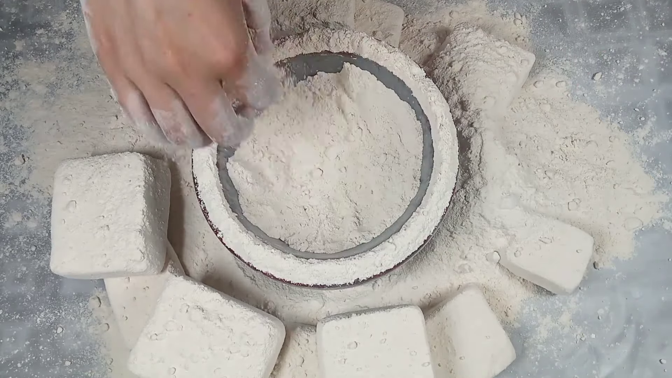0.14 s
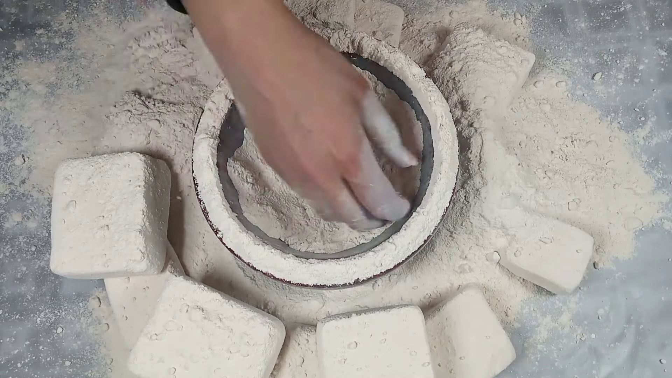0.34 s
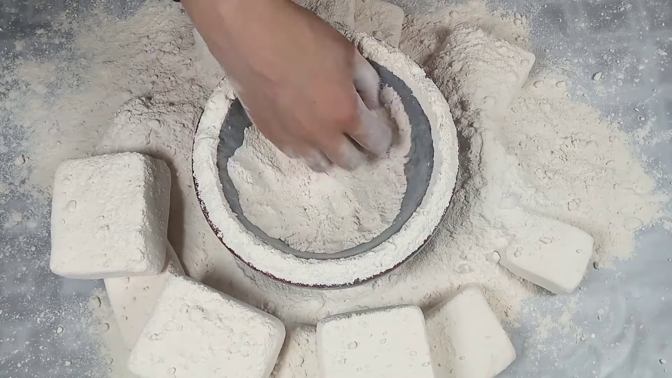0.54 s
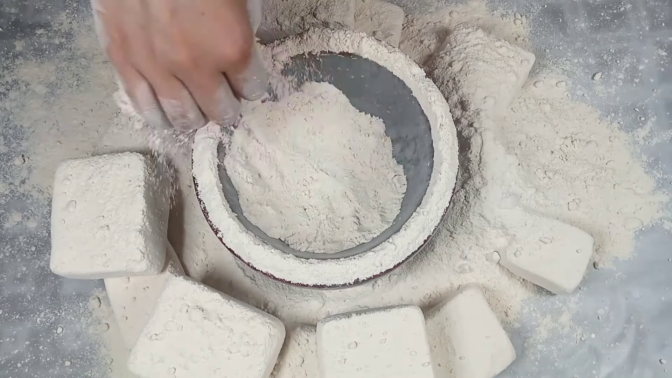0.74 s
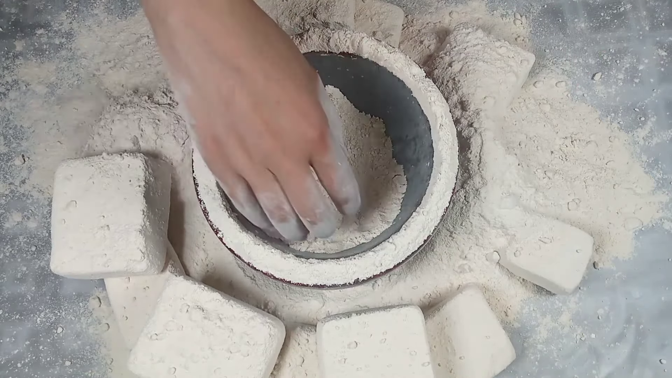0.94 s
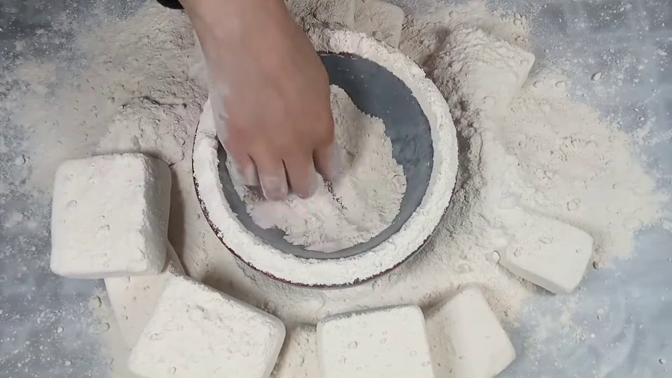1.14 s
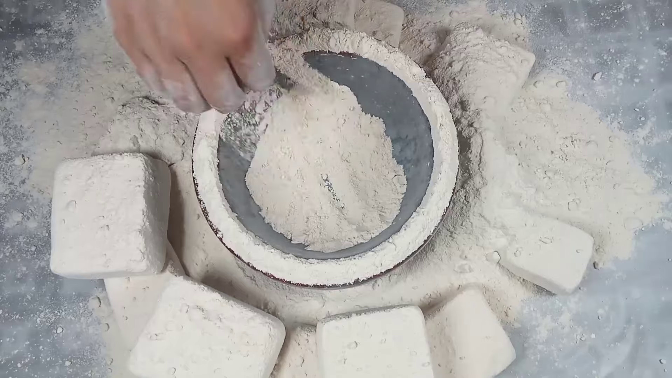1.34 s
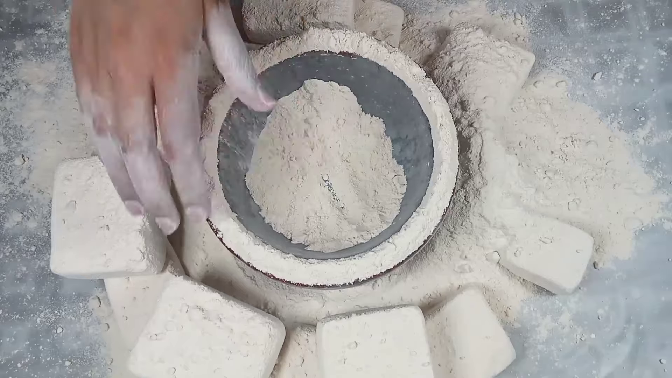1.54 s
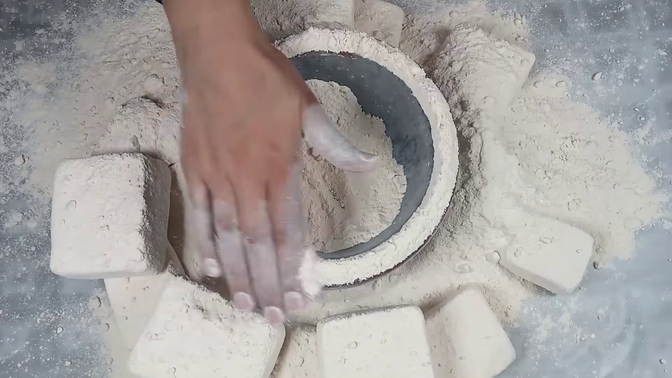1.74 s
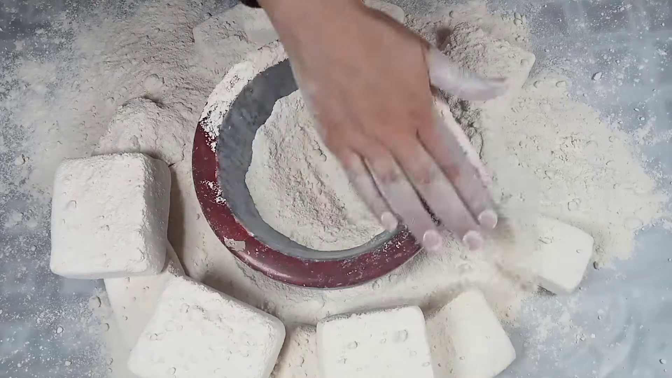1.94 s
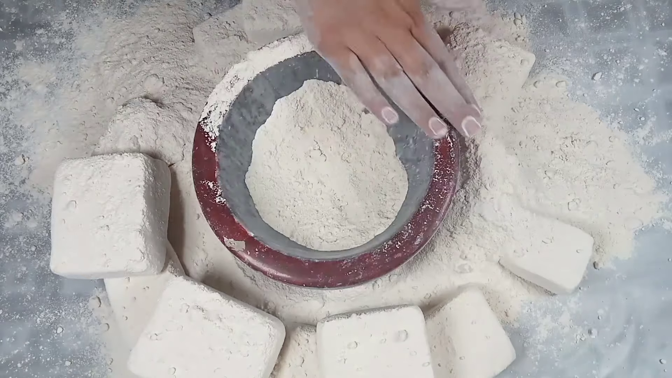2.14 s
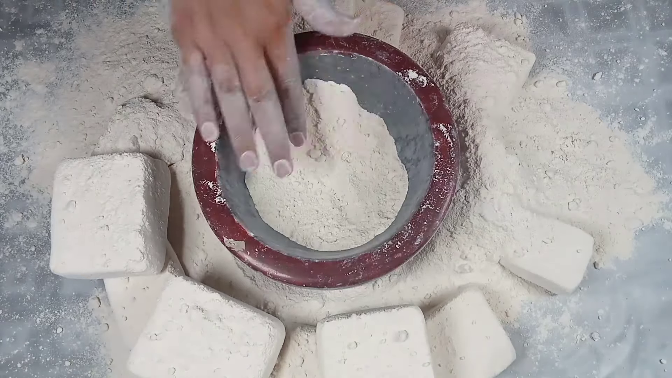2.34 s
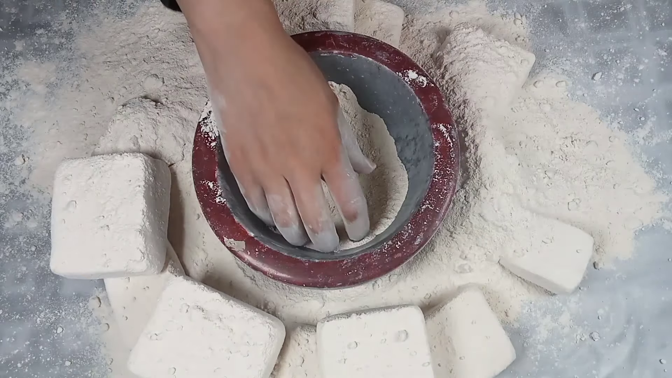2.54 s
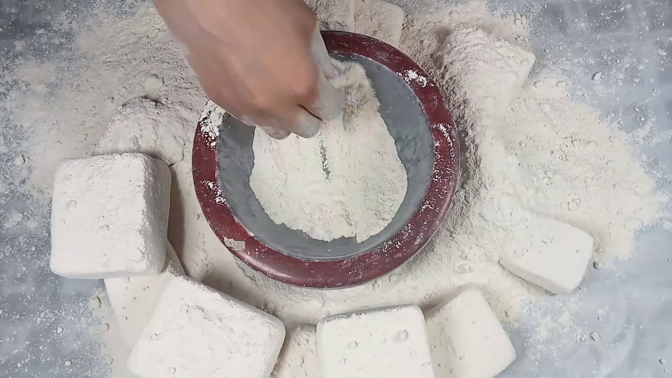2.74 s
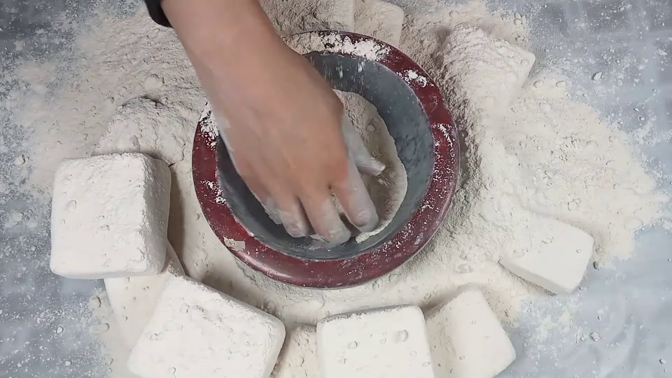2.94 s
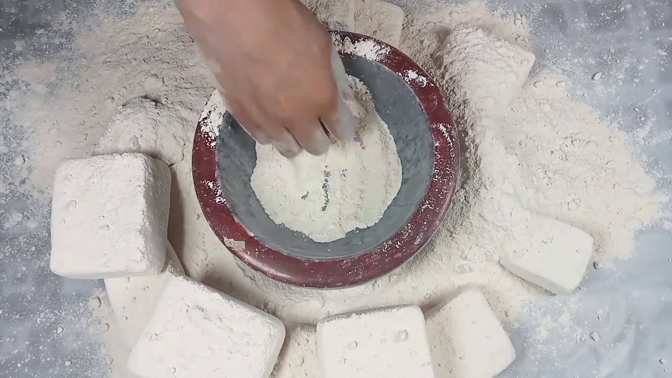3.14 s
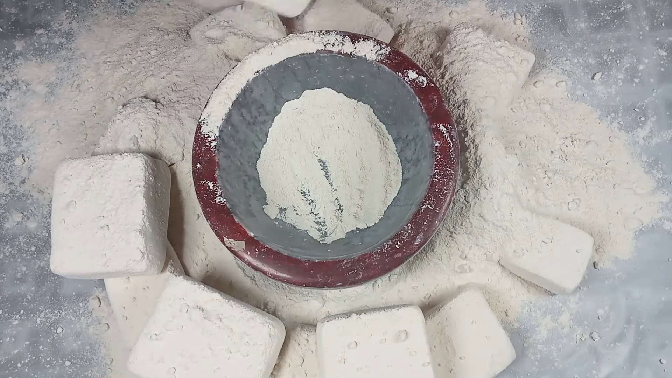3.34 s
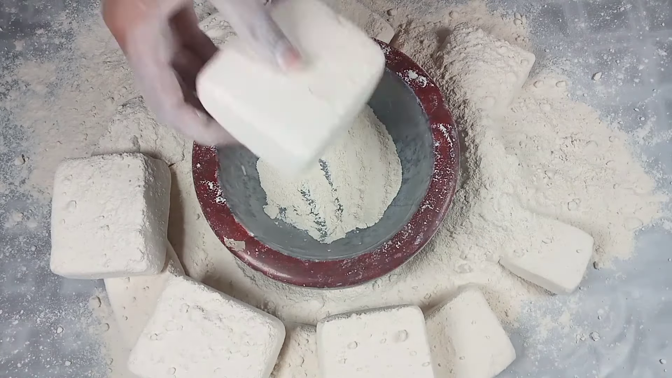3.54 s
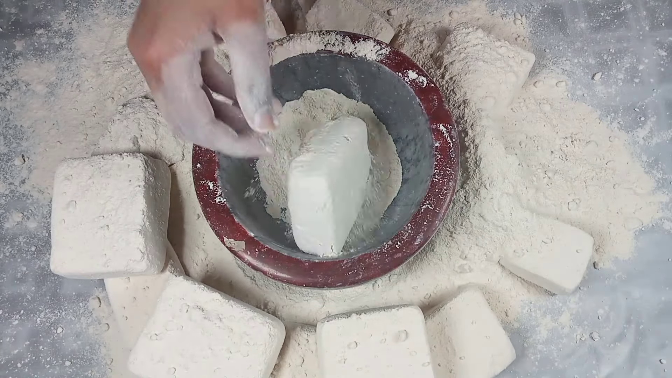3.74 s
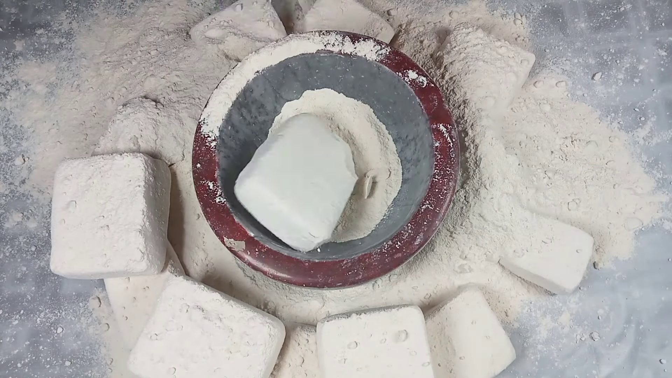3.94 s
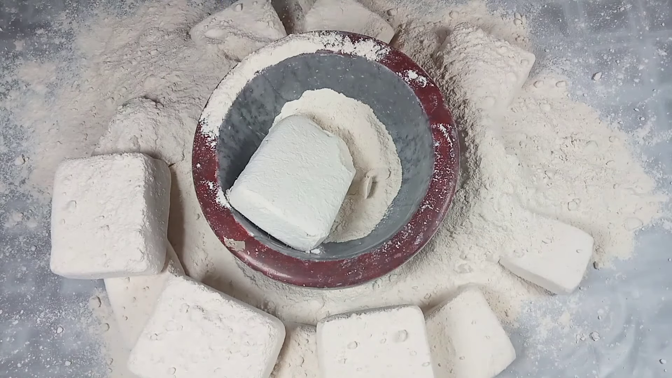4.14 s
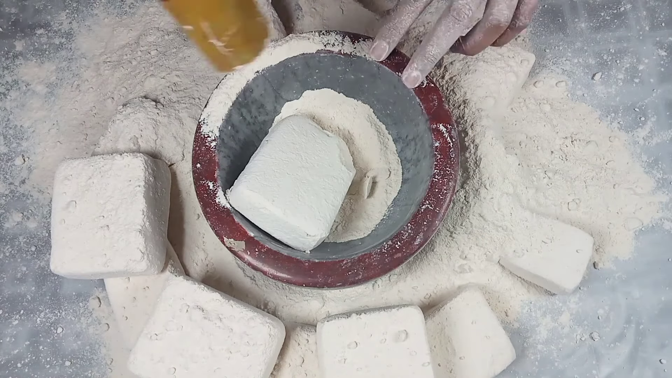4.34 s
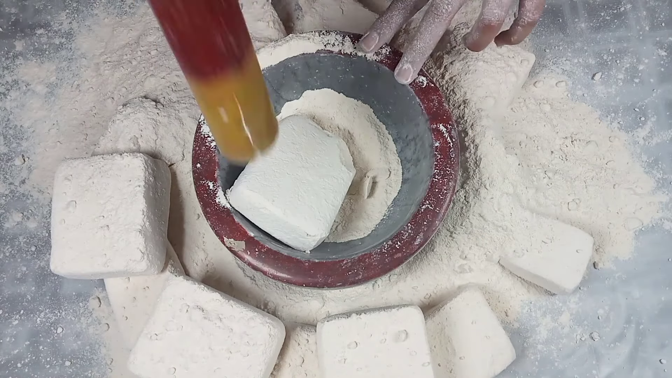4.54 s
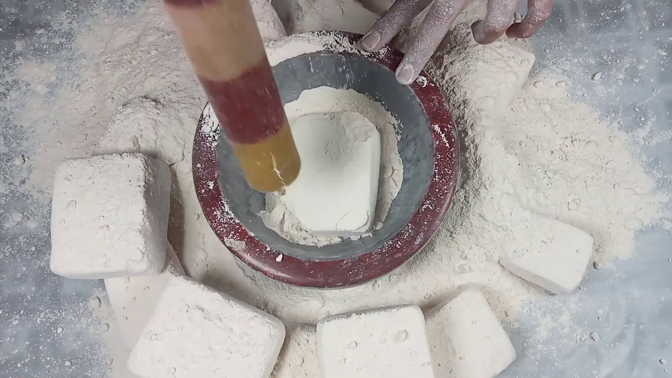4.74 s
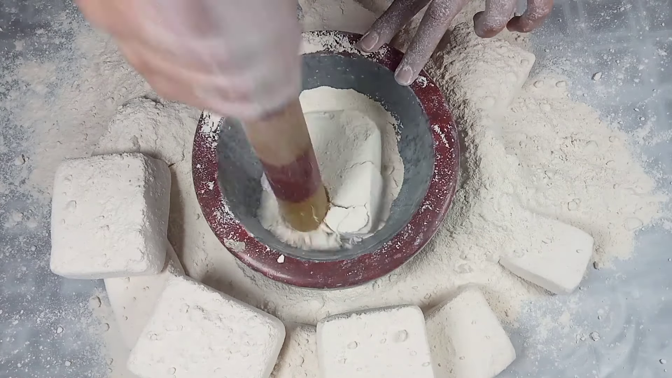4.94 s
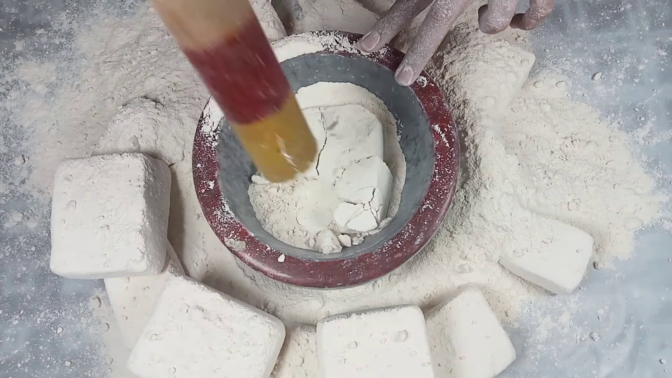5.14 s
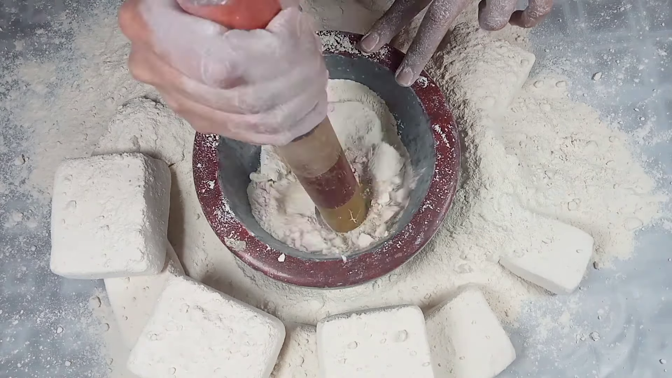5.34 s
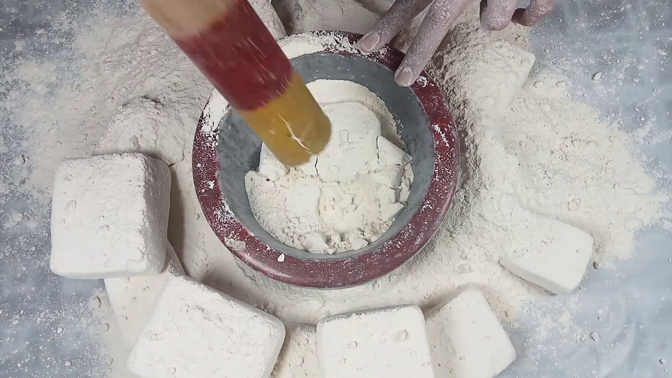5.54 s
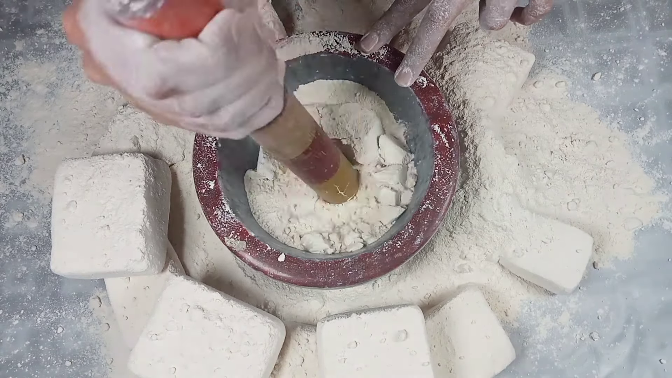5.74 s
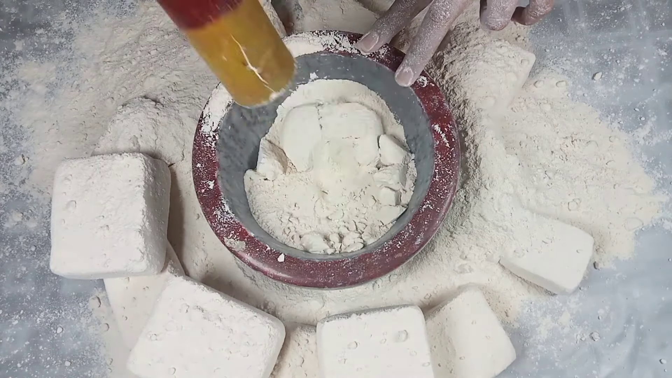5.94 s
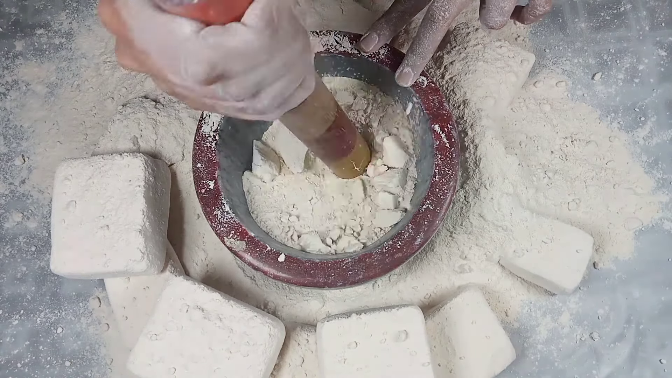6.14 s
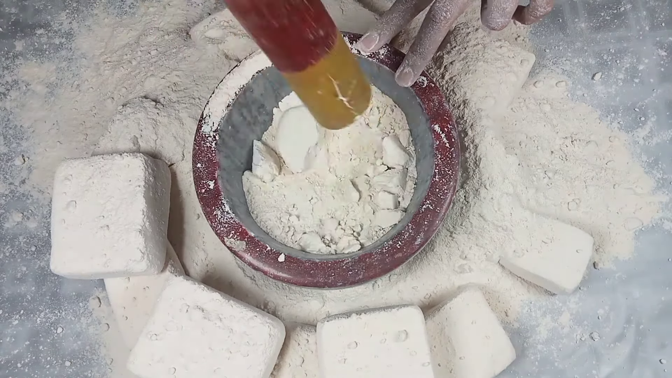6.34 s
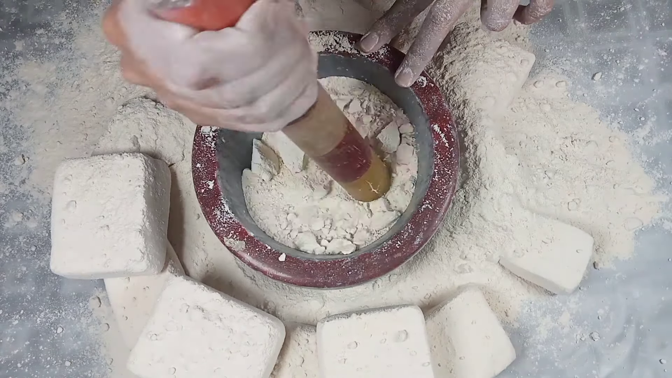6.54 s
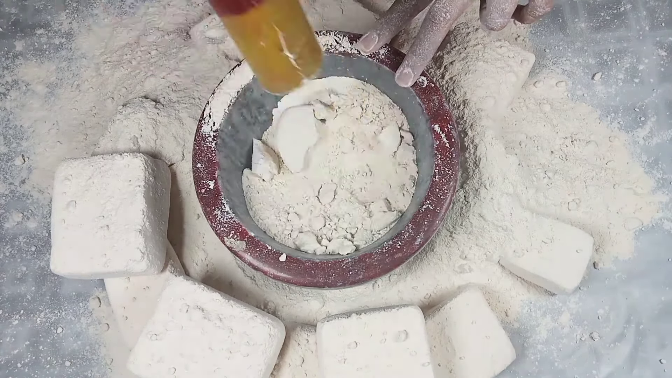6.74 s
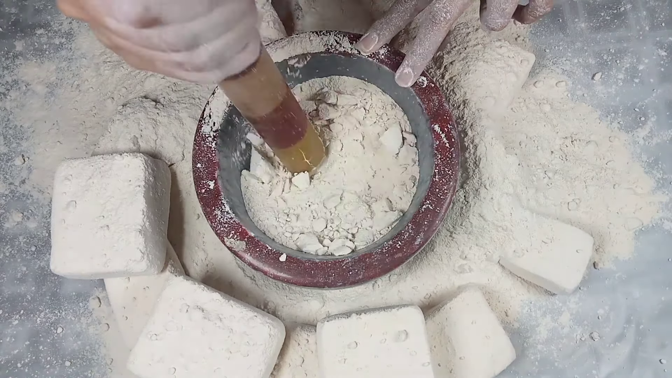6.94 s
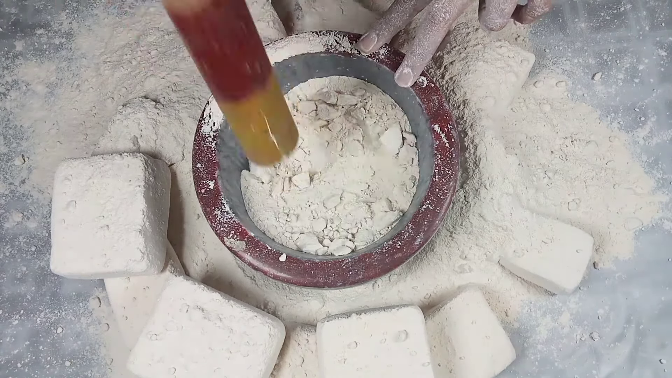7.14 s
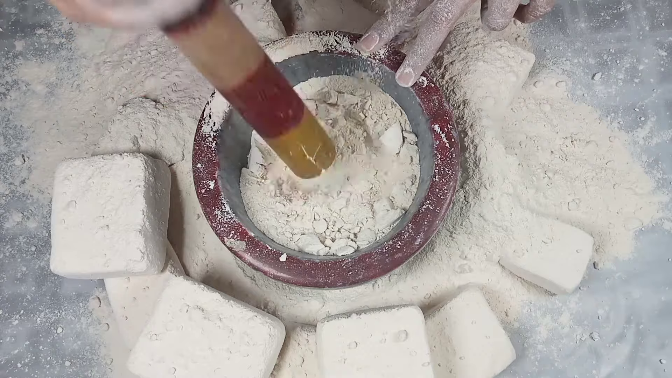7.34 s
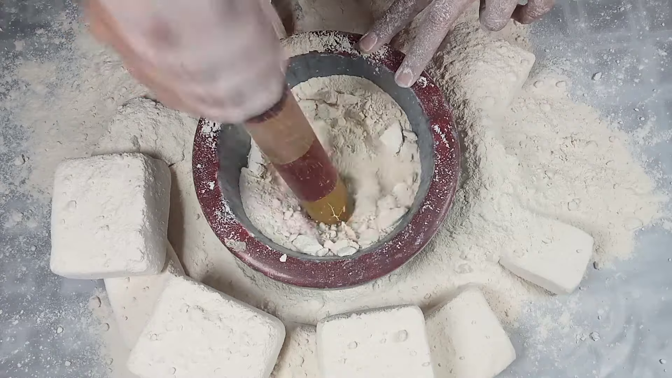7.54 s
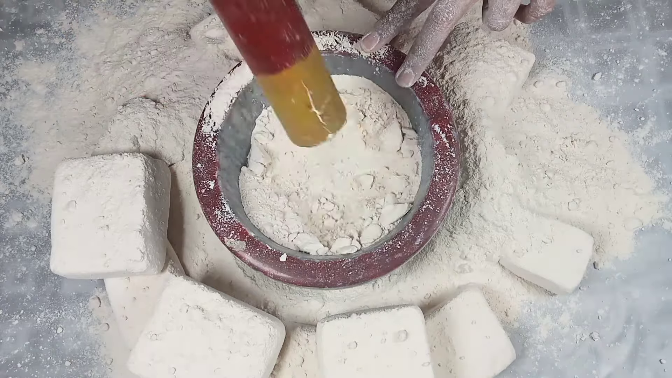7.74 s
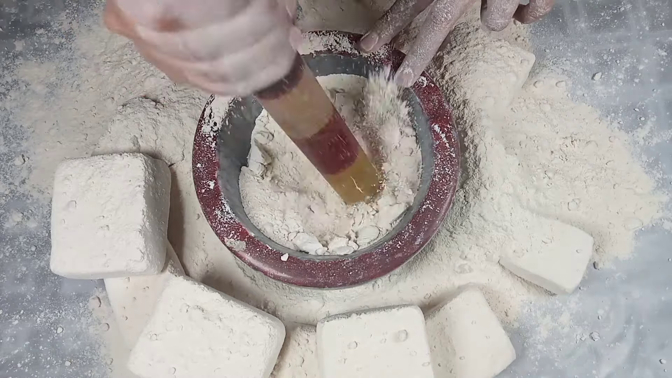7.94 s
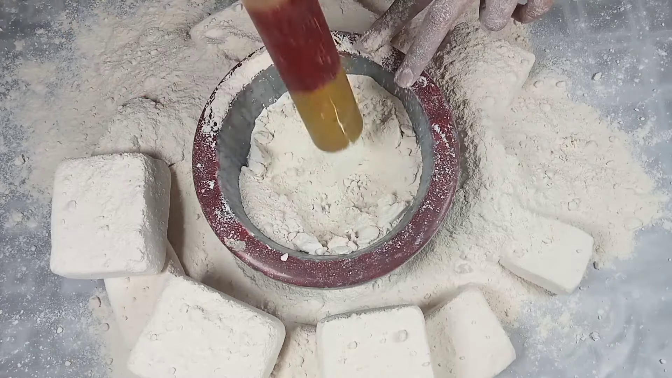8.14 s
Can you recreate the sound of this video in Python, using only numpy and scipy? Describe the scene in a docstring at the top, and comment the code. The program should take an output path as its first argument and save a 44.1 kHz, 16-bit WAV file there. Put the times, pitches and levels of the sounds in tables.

```python
"""Fingers scoop chalk powder in a heavy mortar and wipe its rim (shaped grit, knocks, soft pats of powder).
At 3.7 s a chalk block drops in and slides down. From 4.6 s a wooden pestle pounds it ten times:
filtered clicks for knocks, dying sines for thuds, runs of fractures for crunches; hard at first, then duller.
Crumbs grind between blows. The microphone is close, in a small room with a low rumble;
the hardest blows overload it."""
import sys
import numpy as np
from scipy import signal
from scipy.fft import rfft, irfft
from scipy.io import wavfile
from scipy.ndimage import uniform_filter1d, map_coordinates

SR = 44100
rng = np.random.default_rng(int(sys.argv[2]) if len(sys.argv) > 2 else 0)


def file_out(sig):
    """Save sig as 16-bit WAV at sys.argv[1]."""
    # one column per channel
    cols = np.atleast_2d(sig).T
    # limit, then scale
    lim = np.clip(cols, -1, 1)
    pcm = np.round(lim * 32767).astype(np.int16)
    wavfile.write(sys.argv[1], SR, pcm)


N = 362061

# room rumble and hiss, spectrum before levelling: f/Hz, level/dB
FLOOR_SPECTRUM = [(15, -54), (25, -31), (87, 7.5), (170, -11), (236, -5), (285, -10), (1230, -24),
                  (1400, -20.5), (1560, -25), (3920, -24.5), (7710, -27.5), (9320, -21), (11300, -31.5),
                  (14800, -35), (16000, -34)]
FLOOR_RUMBLE_DB, FLOOR_HISS_DB = -50.5, -49.3  # rumble before its wander

# hand through powder, block sliding over it:
# t at full pressure/s, rise/s, hold/s, release/s, loose hiss/dB, packed rasp/dB, rub on bowl/dB
STROKES = [(0.0, 0.022, 0.084, .04, -50, -53, -53.5), (0.367, 0.16, 0.1, .06, -46, -48, -53.5),
           (0.493, .04, .015, 0.28, -40, -38, -43.5), (0.62, 0.17, 0.11, 0.033, -45.5, -53, -57),
           (1.079, 0.17, 0.13, 0.25, -44, -44, -47.5), (1.18, 0.1, 0.016, 0.088, -43, -34, -61),
           (1.297, 0.085, 0.041, 0.034, -46, -54, -73), (1.65, .015, .05, .1, -50, -52, -57),
           (1.71, 0.087, 0.12, 0.083, -40, -46, -52), (1.887, 0.26, 0.24, 0.37, -32, -43.5, -56),
           (2.265, 0.23, 0.056, 0.041, -33, -42.5, -69), (2.553, 0.21, .005, .03, -58, -55.5, -56),
           (2.57, .016, 0.0079, 0.06, -32, -50, -44), (2.643, 0.14, 0.012, 0.11, -34, -38.5, -49),
           (2.698, 0.087, 0.021, 0.054, -38.5, -37.5, -44.5), (3.06, 0.14, 0.073, 0.057, -39, -35.5, -41.5),
           (3.153, .04, 0.016, 0.13, -33.5, -33, -45), (3.255, 0.11, 0.034, 0.24, -42, -42.5, -46.5),
           (3.429, 0.17, 0.21, 0.11, -49, -52.5, -52), (3.679, 0.13, 0.018, 0.25, -37.5, -44, -55),
           (3.998, 0.41, 0.14, 0.19, -38.5, -41.5, -44), (4.28, 0.11, 0.072, 0.36, -45, -46.5, -52)]
RAMP_DB = 33  # gained over a rise, lost over a release
TRICKLE_DB, TRICKLE_RASP_DB, TRICKLE_RUB_DB = -81, -73, -68.5  # powder sifting between strokes
# sliding dust: f/Hz, level/dB
DUST_SPECTRUM = [(200, -11), (800, -8.5), (2500, -20), (4500, -4), (7000, -0.5), (8200, 0.5), (9400, 8.5),
                 (10800, -1), (12500, -5), (16000, -7)]
# packed powder sticking and slipping: f/Hz, level/dB
RASP_SPECTRUM = [(200, -27), (1200, -8.5), (1900, -4.5), (2700, -0.5), (3300, 1), (4400, -0.5),
                 (6000, -4.5), (9000, -12), (16000, -54)]
# powder rubbed on the bowl: f/Hz, level/dB
RUB_SPECTRUM = [(150, -10.5), (400, -4), (600, -5.5), (830, 0.5), (1100, -3.5), (1500, -5), (2200, -7),
                (5000, -24), (16000, -49.5)]

# room tail: f/Hz, level/dB, t60/s
ROOM = [(50.3, -20, 0.66), (95.8, 8, 1), (168, -2, 0.7), (230, -9, 0.62), (598, -3.5, 0.41),
        (1300, -8, 0.36), (3480, -11, 0.32), (10100, -11, 0.064)]

# loudest crumbs that snap: t/s, level of the run/dB, t60/s
SNAPS = [(.077, -38.5, 0.029), (.727, -32.5, 0.032), (.99, -42, 0.13), (1.047, -26, .06), (1.544, -49, .06),
         (1.638, -42, .08), (2.033, -27, .015), (2.0987, -25, .016), (2.5673, -29, 0.055),
         (2.9854, -25.5, 0.078), (3.371, -34.5, 0.026), (4.2795, -32, 0.055), (4.7703, -21.5, 0.032),
         (4.781, -25, 0.049), (4.842, -30, .03), (4.882, -28, .02), (4.903, -29, .042),
         (7.2174, -32, 0.017), (7.519, -42, 0.028), (7.8387, -32.5, 0.039)]
# block drop, then pestle contacts (three in the first blow, as the block splits):
# t/s, table boom/dB, mortar thud/dB, knock before trim/dB, knock low edge f/Hz, knock top edge f/Hz,
# crunch/dB, crunch t60/s, crumb spray/dB
BLOWS = [(3.7249, -23, -13.5, -3.5, 328, 1020, -22.5, 0.029, -48),
         (4.6211, -28, -49, -8.5, 400, 940, -4.5, 0.01, -29.5),
         (4.6227, -56, -30, -1.5, 400, 950, -19.5, .056, -45),
         (4.6307, -37, -15, 9, 623, 1400, -43, 0.37, -48),
         (4.9846, -19.5, -2, 10.5, 304, 1890, -13, .027, -28),
         (5.3651, -40, -36, 8.5, 556, 1950, -10.5, 0.024, -36),
         (5.7394, -23.5, -15.5, -5, 220, 1250, -16.5, 0.027, -32.5),
         (6.1252, -31.5, -13, 0, 230, 1390, -7.5, 0.033, -30),
         (6.5096, -40, -16.5, 4, 395, 1540, -14, 0.04, -35),
         (6.896, -37, -20, 5.5, 570, 2540, -8, 0.012, -50),
         (7.2324, -30, -18, -9.5, 200, 1930, -18, 0.05, -37.5),
         (7.5768, -30, -22, -16, 1500, 3380, -11, 0.03, -30.5),
         (7.9205, -21, -11.5, -13, 400, 1640, -16, 0.039, -33)]
SPRAY_T60_S = 0.24
# bursting lumps: f/Hz, level/dB
CRUNCH_SPECTRUM = [(100, -0.5), (600, -2.5), (1300, 2.5), (2200, 4), (3500, 3), (5500, -2), (7500, -6.5),
                   (9300, -1), (11500, -15.5), (16000, -22)]
# snapping, flying and rolling crumbs: f/Hz, level/dB
CRUMB_SPECTRUM = [(150, 1), (800, -5), (2000, -0.5), (3500, 4), (5500, 0.5), (7500, -1.5), (9400, 6),
                  (11500, -4.5), (16000, -8.5)]

# light contacts of fingers and block with the bowl; last two rows: low knock of two pestle blows:
# t/s, level before trim/dB, low edge f/Hz, top edge f/Hz
BUMPS = [(.262, -36, 387, 1800), (0.414, -27, 293, 1190), (1.05, -19.5, 700, 1500), (1.544, -37, 400, 1800),
         (2.033, -14.5, 700, 2780), (2.101, -19.5, 2000, 3020), (4.002, -14.5, 150, 1100),
         (4.14, -34, 300, 860), (5.742, -17, 280, 410), (6.1273, -13, 300, 376)]
KNOCK_TRIM_DB = -2.0  # on all bumps and knocks
# ring of bowl and pestle: f/Hz, relative level/dB, t60/s
BOWL_MODES = [(403, -10.5, 0.025), (615.2, -23.5, 0.23), (823, -15.5, 0.036), (869, -16, 0.05),
              (1187, -8.5, 0.021), (1395, -3.5, 0.024), (1760, -28, 0.025), (2280, -13.5, 0.036),
              (2850, 9.5, 0.004), (3350, 5.5, 0.0081)]

# handfuls of powder landing: t/s, level/dB, half width/s
PATS = [(0.293, -41.5, 0.027), (0.938, -41.5, 0.022), (1.559, -45.5, 0.017)]
# their dull puff: f/Hz, level/dB
PAT_SPECTRUM = [(60, -29), (200, 4), (400, -3.5), (700, -8), (1500, -10), (3000, -21), (8000, -27),
                (16000, -38)]

# mortar rocking: f/Hz, relative level/dB, t60/s
MORTAR_MODES = [(230, 4, 0.086), (223.6, -23.5, 0.36), (267.3, -19, 0.35), (318, -11, 0.13),
                (457, -6, 0.064)]
# table top, and mortar rocking on it: f/Hz, relative level/dB, t60/s
TABLE_MODES = [(89.5, -1.5, 0.21), (105.9, -7, 0.41)]

# pestle twisting or lifting in the crumbs: t at full pressure/s, hold/s, level/dB
STIRS = [(4.793, 0.16, -37), (5.087, 0.0069, -44.5), (5.22, 0.026, -50.5), (5.46, 0.0098, -43.5),
         (5.83, 0.013, -46), (5.978, 0.022, -51.5), (6.073, 0.04, -46), (6.373, .02, -47.5),
         (6.655, 0.11, -56.5), (6.875, .02, -47), (7.542, 0.031, -49), (7.7, .04, -52), (7.87, 0.058, -47),
         (8.034, 0.065, -47), (8.11, 0.034, -46)]
STIR_RISE_S, STIR_RELEASE_S = 0.09, 0.14

LIMIT_DB, RECOVER_DB_PER_S = 2, 40  # limiter; 0 dB is full scale
EDGE_HZ = 15750


def amp(db):
    """Decibels to amplitude."""
    return 10 ** (np.asarray(db) / 20)


def evened(x):
    """Scales to rms 1."""
    return x / np.sqrt(np.mean(x ** 2) + 1e-20)


def read(points, hz):
    """A spectrum, joined by straight lines over log frequency."""
    f, value = np.transpose(points)
    return np.interp(np.log(hz + 1), np.log(f), value)


def add(mix, s, sound):
    """Lays a sound into the mix at time s."""
    part = mix[round(s * SR):][:len(sound)]
    part += sound[:len(part)]


def through(x, response):
    """Convolves, keeping the length."""
    return signal.oaconvolve(x, response)[:len(x)]


def causal(db_at, size=2048):
    """Minimum-phase click with the given spectrum and energy 1."""
    hz = abs(np.fft.fftfreq(size, 1 / SR))
    log_gain = np.log(amp(db_at(hz)) + 1e-5)
    min_phase = np.exp(np.conj(signal.hilbert(log_gain)))
    click = np.fft.ifft(min_phase).real[:size // 2]
    return click / np.linalg.norm(click)


def coloured(x, spectrum):
    """Gives white noise or clicks a spectrum, at the same power."""
    return through(x, causal(lambda hz: read(spectrum, hz)))


def ring(modes):
    """One second of dying sines."""
    t = np.arange(SR) / SR
    return sum(amp(db - 60 * t / t60) * np.sin(2 * np.pi * hz * t) for hz, db, t60 in modes)


def flutter(hz):
    """Random line of rms 1 with hz new values a second, joined by straight lines."""
    values = rng.standard_normal(N)
    return evened(np.interp(np.arange(N) * hz / SR, np.arange(N), values))


def grit(per_s, spread_db):
    """Tiny fractures: random clicks of either sign and spread sizes, at rms 1."""
    size = amp(spread_db * np.minimum(rng.exponential(1, N), 4))
    sign = rng.choice([-1., 1.], N)
    return evened(size * sign * (rng.random(N) < per_s / SR))


def floor():
    """Low, wandering room rumble and faint steady hiss, split near 300 Hz."""
    hz = np.fft.rfftfreq(N, 1 / SR)
    white = rfft(rng.standard_normal(N))
    noise = evened(irfft(white * amp(read(FLOOR_SPECTRUM, hz)), N))
    rumble = irfft(rfft(noise) / (1 + (hz / 300) ** 4), N)
    hiss = noise - rumble
    wander = amp(5.0 * flutter(hz=9))
    return amp(FLOOR_HISS_DB) * hiss + amp(FLOOR_RUMBLE_DB) * rumble * wander


def stroke(s, rise_s, hold_s, release_s, rounding=1.076):
    """Pressure builds until time s, is held, and eases off: a gain at every sample."""
    t = np.arange(N) / SR - s
    off_peak = np.maximum(-t / rise_s, (t - hold_s) / release_s)
    return amp(-RAMP_DB * np.clip(off_peak, 0, 10) ** rounding)


def patchy(x, depth_db, width_hz=500, length_s=.05):
    """Patches of the spectrum swell and sink at random; depth is rms, output is rms 1."""
    hz, frame_s, z = signal.stft(x, SR, nperseg=512, noverlap=384)
    where = np.meshgrid(frame_s / length_s, hz / width_hz)
    patches = map_coordinates(rng.standard_normal((400, 200)), where, order=1, mode="wrap")
    z = z * amp(depth_db * evened(patches))
    return evened(signal.istft(z, SR, nperseg=512, noverlap=384)[1][:N])


def powder():
    """One pressure drives dust hiss, stick-slip rasp and rub; the hand's hollow, changing shape, makes patches."""
    power = amp([[TRICKLE_DB], [TRICKLE_RASP_DB], [TRICKLE_RUB_DB]]) ** 2
    for row in STROKES:
        power = power + np.outer(amp(row[4:]), stroke(*row[:4])) ** 2
    loose, packed, on_bowl = np.sqrt(power)
    slips = flutter(hz=169.8)

    dust_grit = patchy(grit(per_s=20000, spread_db=3.5), depth_db=1.5)
    rasp_grit = patchy(grit(per_s=4500, spread_db=1.5), depth_db=2.5)
    rub_grit = patchy(grit(per_s=2500, spread_db=2.4), depth_db=2, width_hz=202)

    hiss = loose * evened(amp(1.1 * slips)) * dust_grit
    rasp = packed * evened(amp(1.06 * slips)) * rasp_grit
    rub = on_bowl * evened(amp(2.4 * slips)) * rub_grit
    return coloured(hiss, DUST_SPECTRUM) + coloured(rasp, RASP_SPECTRUM) + coloured(rub, RUB_SPECTRUM)


def room(x, build_s=0.0029, near_db=-13, near_t60_s=0.017):
    """Quick scatter from the table top, then a tail in which the bass lasts longest."""
    t = np.arange(SR) / SR
    taps = evened(rng.standard_normal(SR) * (rng.random(SR) < 4000 / SR))  # 4000 echoes/s
    hz, frame_s, z = signal.stft(taps, SR, nperseg=1024)
    rows = np.array(ROOM)
    db = read(rows[:, :2], hz)[:, None]
    t60 = read(rows[:, ::2], hz)[:, None]
    same_energy = np.sqrt(np.log(1e6) / (t60 * SR))  # whatever the t60
    z = z * amp(db - 60 * frame_s / t60) * same_energy
    tail = signal.istft(z, SR, nperseg=1024)[1][:SR] * (1 - np.exp(-(t / build_s) ** 2))
    near = rng.standard_normal(SR) * amp(-60 * t / near_t60_s) * (t > .0015)
    return through(x, tail + amp(near_db) * near / np.linalg.norm(near))


def avalanches(rows, crack_db, spread_db, rise_s=0.00026, brittle_s=0.017):
    """Chalk gives way with one crack, then a run of fractures; long runs have weaker cracks."""
    force, cracks, t = np.zeros(N), np.zeros(N), np.arange(SR // 3) / SR
    for s, db, t60 in rows:
        add(force, s, amp(db - 60 * t / t60) * (1 - np.exp(-t / rise_s)))
        add(cracks, s, amp([db + crack_db]) * min(1, brittle_s / t60))
    clumps = evened(amp(0.85 * flutter(hz=695)))
    return cracks + force * clumps * grit(per_s=24000, spread_db=spread_db)


def crunches():
    """Small crumbs snap brightly; lumps burst under the pestle and throw a spray of crumbs."""
    snaps = avalanches(SNAPS, crack_db=15.5, spread_db=-0.5)
    lumps = avalanches([(row[0], *row[6:8]) for row in BLOWS], crack_db=7.0, spread_db=0.5)
    spray_rows = [(row[0], row[8], SPRAY_T60_S) for row in BLOWS]
    spray = avalanches(spray_rows, crack_db=0, spread_db=5.5)
    return coloured(lumps, CRUNCH_SPECTRUM) + coloured(spray + snaps, CRUMB_SPECTRUM)


def knock(low_hz, top_hz, steep=3.8, ring_db=-28, bass_hz=130):
    """One contact, peak 1: a harder one reaches higher; it sets bowl and pestle ringing."""
    def push_db(f):
        rise_db = 20 * np.log10((f + 1) ** 2 / np.hypot(f, low_hz) / np.hypot(f, bass_hz))
        return rise_db - 10 * np.log10(1 + (f / top_hz) ** (2 * steep))

    push = np.pad(causal(push_db), (0, SR // 4))
    sound = push + amp(ring_db) * through(push, ring(BOWL_MODES))
    return sound / abs(sound).max()


def knocks():
    """Fingers, block and pestle strike something firm: band-shaped clicks with a ring."""
    out = np.zeros(N)
    for s, db, low_hz, top_hz in BUMPS + [(row[0], *row[3:6]) for row in BLOWS]:
        add(out, s, amp(db + KNOCK_TRIM_DB) * knock(low_hz, top_hz))
    return out


def pats():
    """Loose powder lands with a dull, rounded puff of grit."""
    t = np.arange(N) / SR
    fall = sum(amp(db) / (1 + ((t - s) / half_width_s) ** 4) for s, db, half_width_s in PATS)
    return coloured(fall * grit(per_s=5000, spread_db=3.0), PAT_SPECTRUM)


def thuds(rise_s=0.0056, table_rise_s=0.0093):
    """The weight of each blow rocks the mortar, and the table booms under it."""
    out, t = np.zeros(N), np.arange(SR) / SR
    thud = ring(MORTAR_MODES) * (1 - np.exp(-t / rise_s))
    boom = ring(TABLE_MODES) * (1 - np.exp(-t / table_rise_s))
    for s, boom_db, thud_db, *_ in BLOWS:
        add(out, s, amp(boom_db) * boom + amp(thud_db) * thud)
    return out


def grinding():
    """Crumbs roll and trickle as the pestle twists and lifts: clumped grit under pressure."""
    power = sum((amp(db) * stroke(s, STIR_RISE_S, hold_s, STIR_RELEASE_S)) ** 2
                for s, hold_s, db in STIRS)
    clumps = evened(amp(1.7 * flutter(hz=142)))
    crumbs = patchy(grit(per_s=9000, spread_db=5.0), depth_db=2.5)
    return coloured(np.sqrt(power) * clumps * crumbs, CRUMB_SPECTRUM)


def scene():
    """All close sounds, their room and the floor, as one channel."""
    close = powder() + crunches() + knocks() + pats() + thuds() + grinding()
    # two random room responses trade places at 0.3 Hz, so each hit gets a different echo colour
    turn = 2 * np.pi * .3 * np.arange(N) / SR
    reverb = room(close * np.cos(turn)) + room(close * np.sin(turn))
    return (close + reverb + floor())[None]


def record(dry):
    """A limiter ducks the hardest blows and recovers; what still exceeds full scale clips; then a low-pass."""
    over_db = np.maximum(20 * np.log10(abs(dry[0]) + 1e-9) - LIMIT_DB, 0)
    recovery_db = RECOVER_DB_PER_S * np.arange(N) / SR
    held_db = np.maximum.accumulate(over_db + recovery_db) - recovery_db
    duck_db = uniform_filter1d(held_db, size=64)
    limited = np.clip(dry * amp(-duck_db), -1, 1)
    low_pass = signal.firwin(401, EDGE_HZ, window=("kaiser", 8), fs=SR)
    return signal.oaconvolve(limited, low_pass[None], "same")


dry = scene()
out = record(dry)
file_out(out)
```